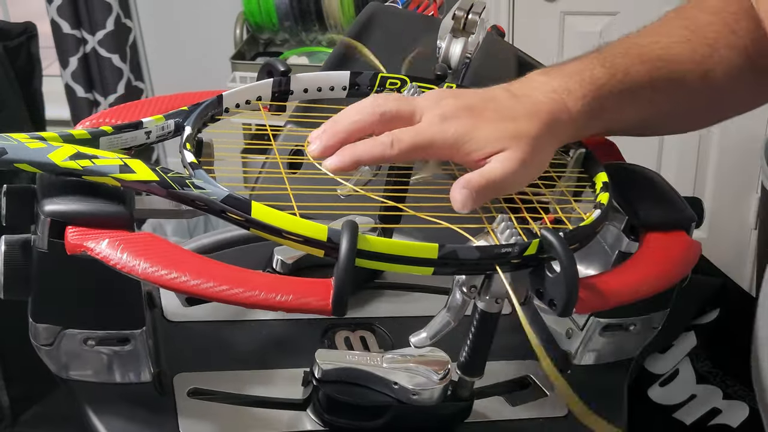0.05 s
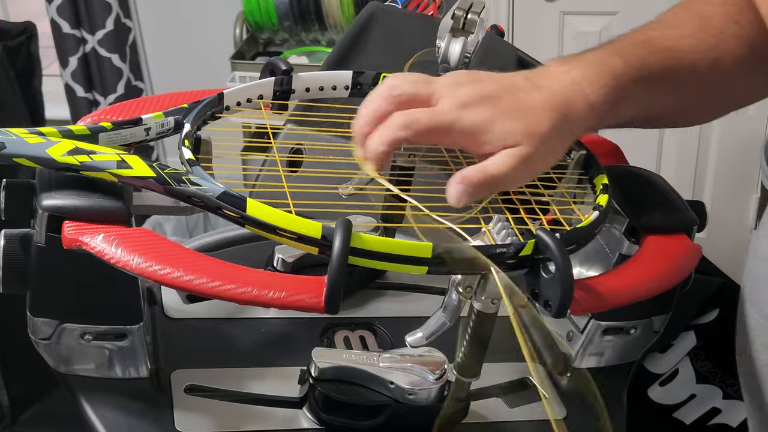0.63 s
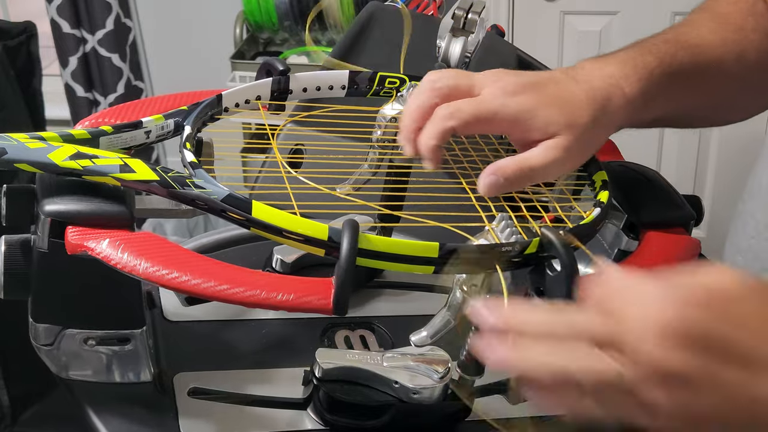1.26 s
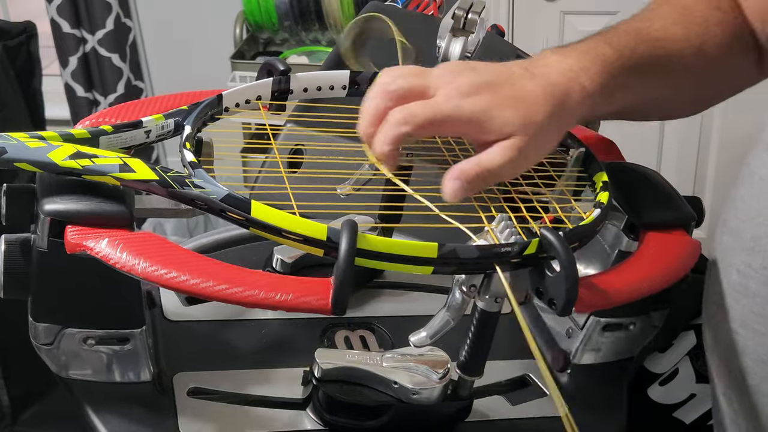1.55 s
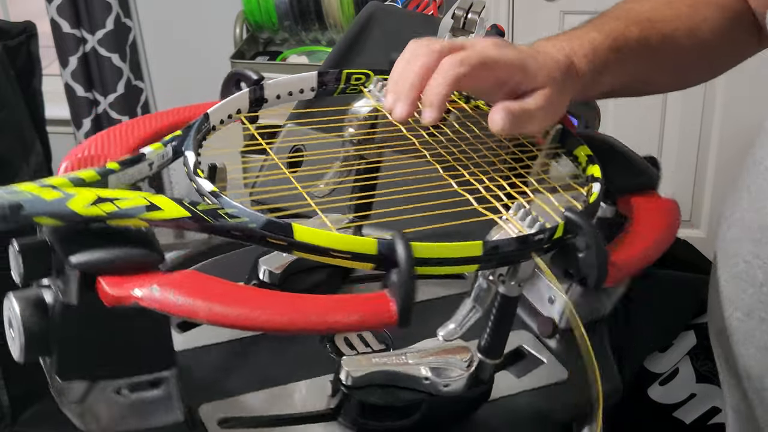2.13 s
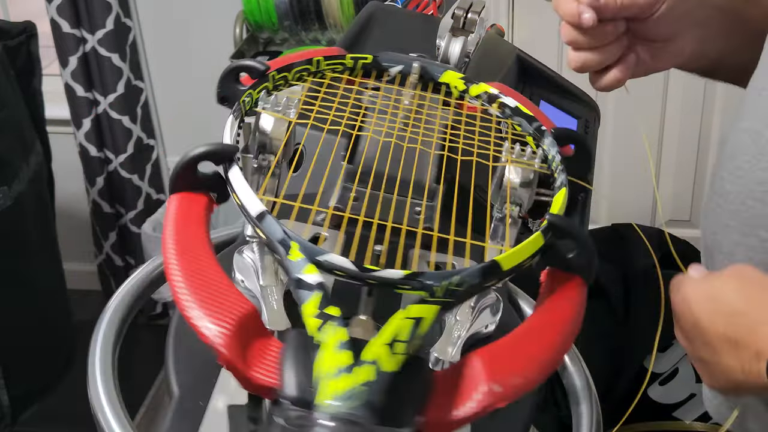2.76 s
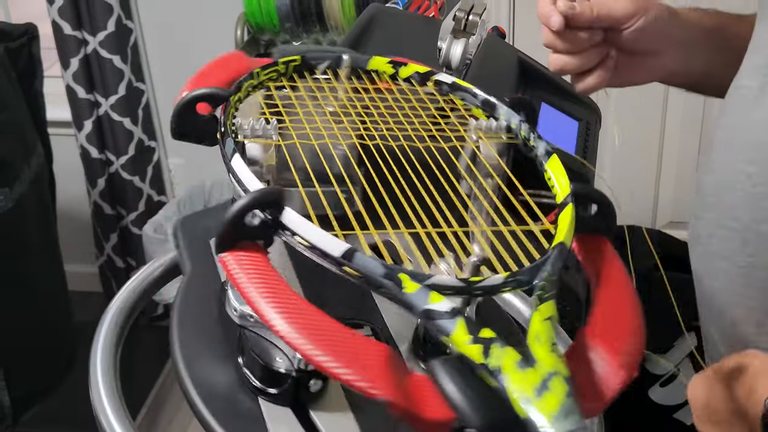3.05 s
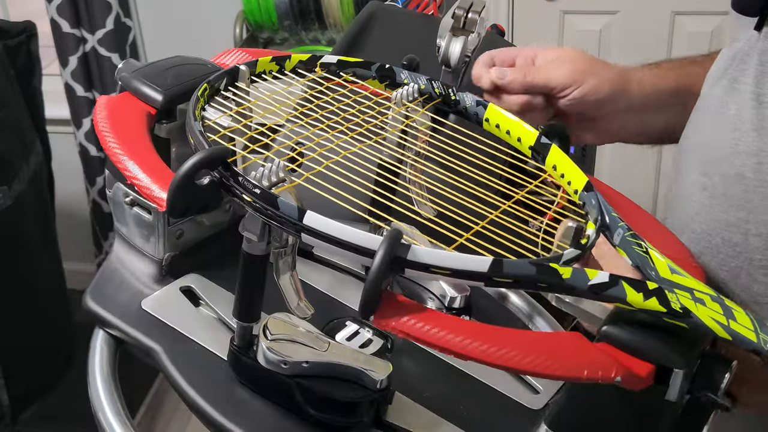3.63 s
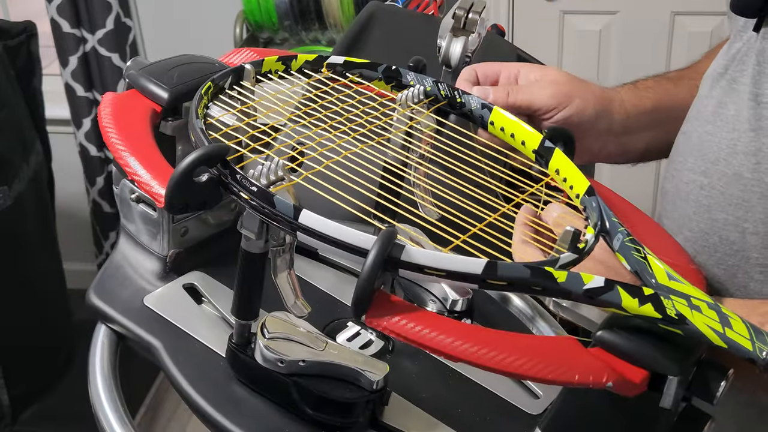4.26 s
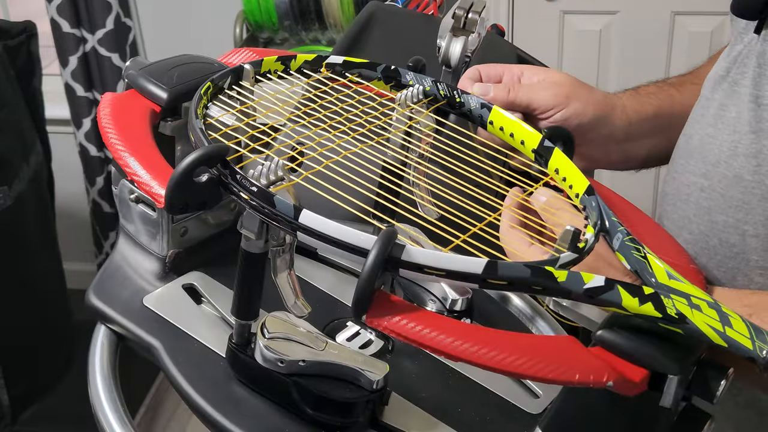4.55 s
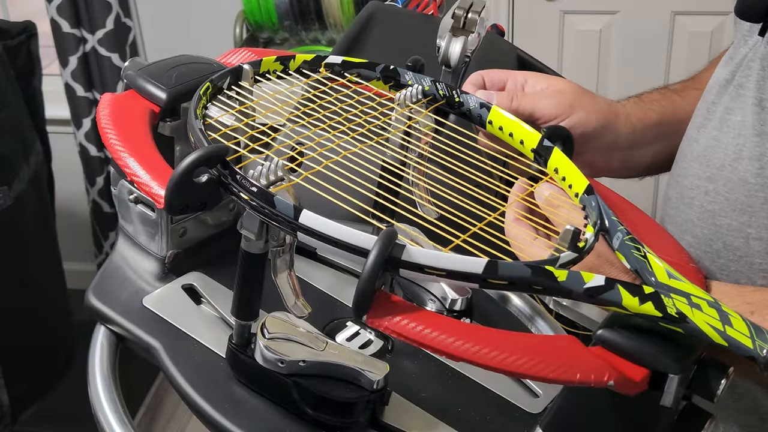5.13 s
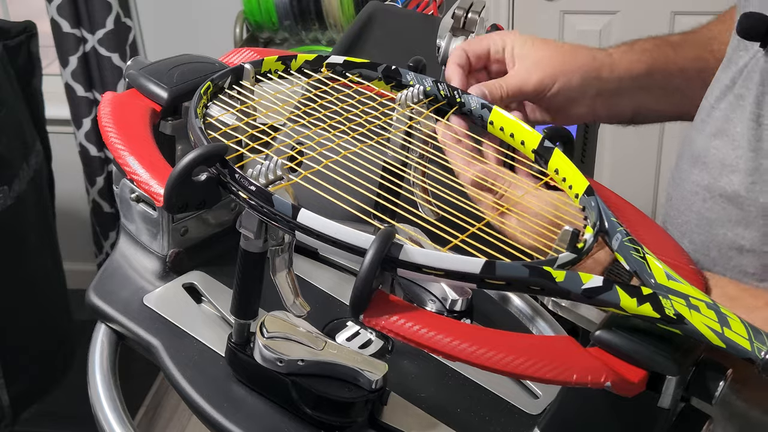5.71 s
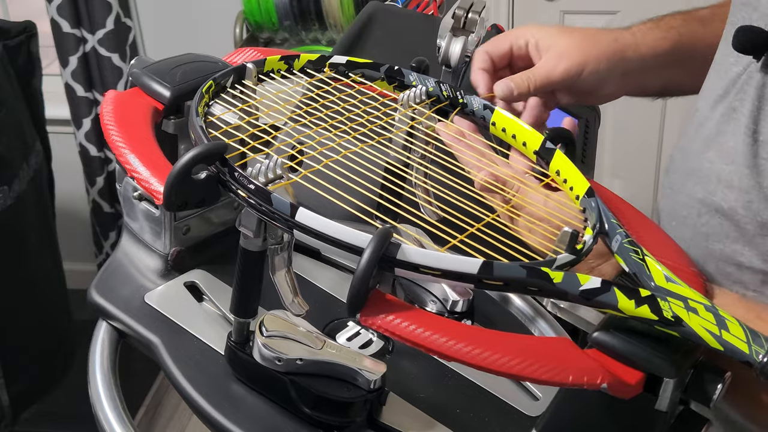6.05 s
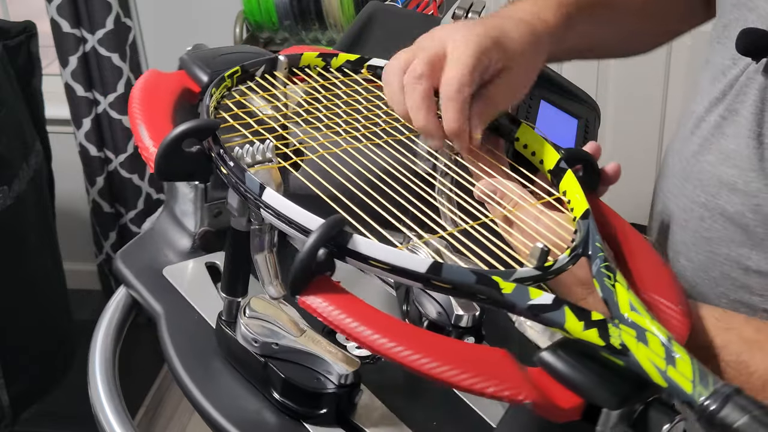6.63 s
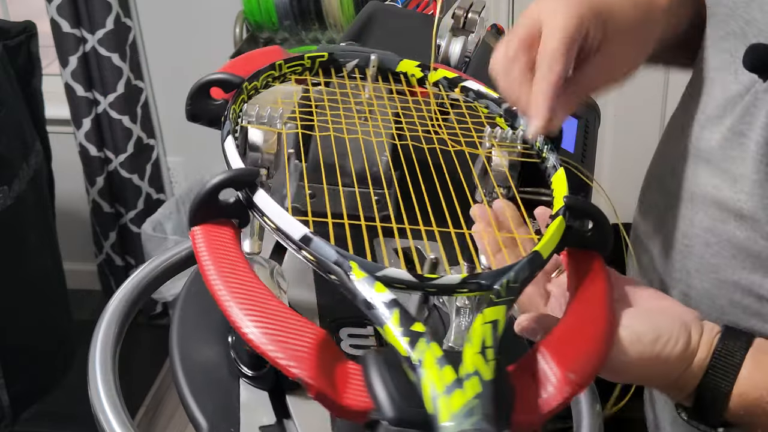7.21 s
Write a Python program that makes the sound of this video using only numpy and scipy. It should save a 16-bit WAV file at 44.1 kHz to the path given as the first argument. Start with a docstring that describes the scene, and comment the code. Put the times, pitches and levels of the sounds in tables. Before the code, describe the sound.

A tennis racket is being strung in a small room, heard through a clip-on microphone. String swishes a few times across the taut strings, which ring slightly, while its loose end ticks on the frame. Quieter weaving follows, with a faint, brief turntable drone. A metal clamp snaps open, and the last pull creaks and squeaks. Dull low bumps and soft sleeve rustle come and go.

```python
"""Stringing a tennis racket.

Small room, clip-on microphone. A cross string swishes over the taut mains, which ring; its loose end
ticks on the frame. Fingers weave the next string, the machine's turntable drones briefly, a clamp snaps
open, and the last pull creaks in stick-slip. Dull low bumps and sleeve rustle as the stringer moves."""
import sys
import numpy as np
from scipy import signal
from scipy.fft import rfft, irfft, next_fast_len
from scipy.io import wavfile

SR = 44100
rng = np.random.default_rng(int(sys.argv[2]) if len(sys.argv) > 2 else 0)


def to_wav(s):
    """Save 16-bit WAV."""
    ch = np.atleast_2d(s).T  # columns
    pcm = np.round(np.clip(ch, -1, 1) * 32767)  # PCM
    wavfile.write(sys.argv[1], SR, pcm.astype(np.int16))


N = 325369
TIME = np.arange(N) / SR

# Event levels are relative; the functions add their own gains.
# strokes: (start [s], length [s], friction [dB], treble re friction [dB], low ring re friction [dB])
PULLS = [(-0.1, 0.13, -14, -3, -6), (0.58, 0.3, -13.5, -1, -7.5), (1.54, 0.17, -15.5, -4, -7.5),
         (1.6, 0.081, -17.5, 1, -14)]
CREAKING_PULL = [(6.77, 0.24, -19, -4, -8.5)]
WEAVING = [(0.139, 0.12, -32, 3.5, -5), (0.365, 0.1, -30.5, 3, -7), (0.501, 0.12, -33, 3, -5.5),
           (1.344, 0.054, -30, 5, -7.5), (1.401, 0.13, -35, 1, -4.5), (1.526, 0.03, -26.5, -6, -0.5),
           (2.162, 0.17, -46.5, -5, -4), (2.36, 0.075, -36, -1, -5), (2.462, 0.26, -49, -1, -3.5),
           (2.87, 0.078, -44.5, -5, -22), (3.079, 0.42, -45.5, -1, -11), (3.512, 0.028, -37, -6, -15),
           (3.847, 0.21, -43, -2, -9), (4.076, 0.38, -56.5, 0, 2), (4.47, 0.028, -41, -4, -4),
           (4.553, 0.035, -42, 2.5, -7), (4.64, 0.11, -45, -1, -11), (5.25, 0.29, -44.5, 4.5, -8),
           (5.646, 0.062, -38, 1, -8.5), (6.029, 0.18, -39.5, -4, -6), (6.283, 0.21, -37, -5, -1.5),
           (6.481, 0.042, -25.5, -4, -11), (6.59, 0.02, -29, -4, -14), (6.641, 0.075, -34, -1, -0.5),
           (7.195, 0.08, -43, -2, -10)]
# hand and sleeve rustle curve: (time [s], level [dB])
RUSTLE = [(0.0, -51.5), (0.33, -52), (0.86, -46.5), (1.07, -55.5), (1.31, -54.5), (1.6, -48.5),
          (1.95, -57.5), (2.44, -59), (3.8, -48), (4.13, -57.5), (5.06, -60), (5.3, -56.5), (5.81, -48.5),
          (6.55, -46.5), (6.94, -45.5), (7.27, -57.5), (7.38, -60)]
# string taps on frame and machine: (time [s], level [dB], treble re level [dB])
TICKS = [(0.1271, -6, -11), (0.3578, -20, -9), (0.386, -12, -6), (0.417, -3, -3), (1.3314, -14.5, -4),
         (1.355, -12, -4.5), (1.483, -9.5, -5), (2.173, -21, -14), (2.2495, -17.5, -11),
         (2.356, -15, -13.5), (2.4042, -13.5, -7), (2.6244, -16.5, -7), (2.8138, -15.5, -0.5),
         (2.818, -17.5, 1), (2.8662, -22, 4.5), (2.901, -20.5, -4), (3.1051, -16, -9), (3.5194, -16.5, -11),
         (3.9004, -20, -9), (4.1305, -27.5, -18), (5.463, -20, -3.5), (5.5223, -20.5, -9),
         (6.2726, -18.5, -7), (6.4927, -14, -6), (6.589, -13, -11), (7.0745, -13.5, -12), (7.2589, -18, -9)]
# hand landing on strings and frame: (time [s], level [dB])
PATS = [(.425, -28), (.462, -31.5), (.572, -37), (0.933, -24), (5.631, -30.5), (5.682, -35), (6.897, -26.5)]
# narrow rings and zings, plus the turntable's low drone (253 Hz row):
# (start [s], length [s], centre [Hz], width [Hz], level [dB])
ZINGS_AND_DRONE = [(1.35, 0.07, 7800, 300, -34), (1.355, 0.04, 14680, 200, -44),
                   (1.645, 0.092, 866, 180, -31.5), (1.652, 0.044, 7180, 910, -17),
                   (1.853, 0.66, 253, 44.7, -50), (2.302, 0.44, 3720, 400, -49),
                   (3.12, 0.07, 1280, 200, -48), (3.375, 0.11, 7700, 250, -44),
                   (3.882, 0.018, 990, 710, -37.5), (4.73, 0.03, 1245, 120, -47),
                   (4.905, 0.06, 1260, 70, -56), (5.287, 0.23, 7670, 300, -49),
                   (6.493, 0.02, 1250, 70, -34)]
# dull bumps: (time [s], level [dB], final pitch [Hz], scuff re level [dB])
BUMPS = [(1.472, -8, 55, -5.5), (1.508, -8, 55, -4), (1.55, 1.5, 64.94, -22), (1.753, -16.5, 82.5, -15),
         (2.068, -16.5, 76, -15.5), (2.35, -20, 55, -17), (3.819, -6.5, 64, -10.5),
         (3.874, -1.5, 65, -13.5), (3.928, 0, 80, -19.5), (4.012, -6.5, 61, -22.5),
         (4.066, -8.5, 57, -15.5), (4.256, -13, 58.5, -28), (6.925, -11, 72, -20), (6.952, -7, 63, -21),
         (6.994, -2, 54.3, -12), (7.076, -5.5, 88, -8.5), (7.113, -1, 65, -17), (7.162, 1.5, 62.4, -24)]
# clamp snap and rattle: (time [s], level [dB], t60 [s])
CLAMP_BLOWS = [(3.5977, -6, 0.044), (3.609, -7.5, 0.067), (3.618, -10, 0.067), (3.638, -16.5, 0.24)]
# close dry clicks: (time [s], level [dB], pitch [Hz])
CLICKS = [(5.334, -24, 2300), (5.404, -18.5, 2150), (5.4171, -13, 3930)]
# friction locked onto one string mode: (start [s], length [s], pitch [Hz], level [dB])
SQUEALS = [(6.792, 0.083, 3875, -23.5), (6.815, 0.088, 1244, -26), (6.825, 0.029, 2490, -23),
           (7.016, 0.01, 2490, -24), (7.019, 0.035, 1520, -34)]

# source spectra: (frequency [Hz], relative density [dB])
PULL_COLOUR = [(350, -46), (600, -17), (919, -13.5), (1050, -13), (1210, 1.5), (1390, -8.5), (1610, -10.5),
               (1780, -8), (2240, -3), (2910, -7.5), (3680, -3.5), (5330, -10), (7310, -8), (14700, -28),
               (16000, -44)]
HUSH_COLOUR = [(15, -56), (25, 1), (70, 9), (405, -2.5), (463, -10), (840, -1), (1230, -12), (1330, -1),
               (1700, -2), (2550, -34), (8590, -5), (12200, -9), (16000, -14)]
RUSTLE_COLOUR = [(40, -1.5), (70, 7), (140, 3), (270, 4), (380, -3.5), (560, -3.5), (750, -8.5),
                 (2000, -8.5), (6000, -12), (12000, -19), (16000, -23)]
TICK_COLOUR = [(400, -24.5), (1200, -8), (3500, -3.5), (7500, 1), (10000, -1.5), (16000, -17.5)]
WEAVE_COLOUR = [(410, -24), (700, -16.5), (1060, -12.5), (1230, 1), (1400, -17.5), (1580, -8), (1730, -15),
                (3690, -10.5), (6920, -12), (7790, -9), (16000, -31.5)]
PAT_COLOUR = [(50, -17), (110, -7.5), (220, -0.5), (330, -13.5), (700, -20), (2000, -60)]
CLAMP_COLOUR = [(150, -38), (250, -17), (414, -17), (576, -6), (775, -7.5), (845, -6), (988, -11),
                (1760, -5.5), (2360, -4.5), (2620, -15), (3060, -5), (4900, -12.5), (6360, -9), (9660, -12),
                (16000, -36)]
CREAK_COLOUR = [(410, -52), (700, -29.5), (1210, -13), (1360, -22), (1770, -15), (2460, -3.5), (3410, -7),
                (3840, -5.5), (4730, -10), (8210, -5), (16000, -28)]

# string bed and frame resonances per stroke type: (frequency [Hz], width [Hz], relative level [dB])
PULL_MODES = [(939, 36, 5.5), (1100, 87, -1), (1231, 37, 5), (1588, 47, 4), (2160, 31, -1.5),
              (2300, 53.4, -3), (3030, 55, -3), (3170, 57, -3.5), (3513, 35, 4.5), (3760, 110, -4),
              (4700, 50, -5), (5900, 130, 0.5), (7290, 280, -30)]
WEAVE_MODES = [(1265, 13, 9), (1480, 53, 4), (2118, 29, 6.5), (2420, 52, 5.5), (3080, 63, 1.5),
               (3690, 350, -0.5), (4960, 200, -2), (7540, 27, -11), (7560, 19, 1), (9150, 83, -11)]
CREAK_MODES = [(1248, 11, 8.5), (1530, 31, 8), (2473, 32, 3.5), (3030, 110, 4), (3830, 120, 7),
               (6410, 30, -6), (8100, 130, -3.5)]
# thin machine metal, tapped: (frequency [Hz], relative level [dB], t60 [s])
METAL_MODES = [(1284, -33, 0.2), (3830, -24.5, 0.1), (7360, -24, 0.1), (7730, -16, 0.063)]
# thin metal under the chattering end: (frequency [Hz], width [Hz], relative level [dB])
CHATTER_MODES = [(3580, 78, -6), (4390, 60, -6), (7560, 35, -1), (7690, 35, 0), (8700, 75, -11),
                 (10700, 45, -14)]
# clamp and base resonances: (frequency [Hz], width [Hz], relative level [dB])
CLAMP_MODES = [(1740, 110, 2), (2220, 130, 0.5), (2920, 160, 4), (3360, 80, 1), (4460, 200, 4),
               (6380, 110, 6)]
# room decay: (frequency [Hz], t60 [s])
ROOM_T60 = [(200, 0.41), (1500, 0.48), (6000, 0.48), (10000, 0.3), (16000, 0.098)]


def from_db(db):
    """Decibels to gain."""
    return 10 ** (np.asarray(db) / 20)


def unit_rms(x):
    """Scale to unit power."""
    return x / np.sqrt(np.mean(x ** 2) + 1e-20)


def at_hz(points, hz):
    """Table lookup on a log-frequency axis."""
    knots_hz, values = np.transpose(points)
    return np.interp(np.log(np.maximum(hz, 1)), np.log(knots_hz), values)


def band(x, low_hz, high_hz):
    """Butterworth band-pass."""
    sos = signal.butter(3, [low_hz, min(high_hz, .49 * SR)], "band", fs=SR, output="sos")
    return signal.sosfilt(sos, x + 1e-18)


def band_noise(low_hz, high_hz):
    """Band of noise, unit power."""
    return unit_rms(band(rng.standard_normal(N), low_hz, high_hz))


def drift(knots_per_s):
    """Random curve through unit-variance knots."""
    knots = rng.standard_normal(8192)
    return np.interp(TIME * knots_per_s, np.arange(len(knots)), knots)


def body(x, colour, modes=(), mode_db=0):
    """Minimum-phase filter of unit power: broad colour plus resonances."""
    size = 2 * next_fast_len(N // 2 + SR // 4)
    hz = np.fft.rfftfreq(size, 1 / SR)
    lift = 1 + sum(from_db(db + mode_db) ** 2 / (1 + (2 * (hz - mode_hz) / width_hz) ** 2)
                   for mode_hz, width_hz, db in modes)
    magnitude = unit_rms(from_db(at_hz(colour, hz)) * np.sqrt(lift))
    cepstrum = irfft(np.log(magnitude))
    response = np.exp(rfft(2 * cepstrum[:size // 2], size) - cepstrum[0])
    return irfft(rfft(x, size) * response)[:N]


def decay(age_s, t60_s):
    """Exponential decay envelope."""
    return from_db(-60 * age_s / t60_s)


def burst(age_s, db, t60_s):
    """Decaying noise of one impact."""
    return from_db(db) * rng.standard_normal(len(age_s)) * decay(age_s, t60_s)


def place(times_s, sounds):
    """Sum short sounds on the timeline."""
    out = np.zeros(N + SR)
    for time_s, sound in zip(times_s, sounds):
        start = max(int(time_s * SR), 0)
        out[start:start + len(sound)] += sound
    return out[:N]


def sliding(strokes, rise_share, slowing_db_per_s):
    """Strokes speed up, hold and slow. Returns friction, treble and low-ring gains."""
    friction = treble = ring = 0
    for start_s, length_s, db, treble_db, ring_db in strokes:
        rise = np.sin(np.pi / 2 * np.clip((TIME - start_s) / (rise_share * length_s), 0, 1)) ** 2
        speed = rise * from_db(-slowing_db_per_s * np.clip(TIME - start_s - length_s, 0, 1))
        friction = np.maximum(friction, from_db(db) * speed)
        treble = np.maximum(treble, from_db(db + treble_db) * speed ** 1.26)  # faster is brighter
        ring = np.maximum(ring, from_db(db + ring_db) * speed)
    return friction, treble, ring


def rub(gains, colour, modes, mode_db, grain_db, judder_db, judder_per_s, echo_gain, flutter_db):
    """String over string: tiny slips, bunched as it catches on each main, shake the bed's resonances."""
    slips = rng.standard_normal(N) * from_db(grain_db * drift(900) + judder_db * drift(judder_per_s))
    # waves return along a changing free length of string
    round_trip_s = np.abs(0.001072 + .00012 * drift(18))
    slips = slips + echo_gain * np.interp(TIME - round_trip_s, TIME, slips)
    sound = body(slips, colour, modes, mode_db)
    low = signal.sosfiltfilt(signal.butter(4, 1600, fs=SR, output="sos"), sound)
    high = signal.sosfiltfilt(signal.butter(3, 5200, "high", fs=SR, output="sos"), sound)
    friction, treble, ring = gains
    ring = ring * from_db(flutter_db * drift(40))
    return friction * unit_rms(sound - low - high) + treble * unit_rms(high) + ring * unit_rms(low)


def background(hush_db=-53, whine_hz=12100, whine_db=-68):
    """Room hush and faint electronic whine."""
    hush = from_db(hush_db) * body(rng.standard_normal(N), HUSH_COLOUR)
    whine = from_db(whine_db) * np.sqrt(2) * np.sin(2 * np.pi * whine_hz * TIME)
    return hush + whine


def rustle(gain_db=11):
    """Hands and sleeves rustle as the arms move."""
    level_db = np.interp(TIME, *np.transpose(RUSTLE))
    return from_db(level_db + gain_db) * body(rng.standard_normal(N), RUSTLE_COLOUR)


def stray_ticks(rate_per_s=6, over_friction_db=15, spread_db=2.5, treble_db=-9, candidates=64):
    """The fed string brushes the frame at random during weaving strokes. Rows as in TICKS."""
    start_s, length_s, friction_db = np.transpose(WEAVING)[:3]
    chance, which, when, strength = rng.random((candidates, 4)).T
    stroke = np.searchsorted(np.cumsum(length_s) / length_s.sum(), which)
    times_s = start_s[stroke] + when * length_s[stroke]
    db = friction_db[stroke] + over_friction_db + spread_db * (2 * strength - 1)
    rows = np.column_stack([times_s, db, np.full(candidates, treble_db)])
    return rows[chance < rate_per_s * length_s.sum() / candidates]


def ticks(crack_t60_s=0.024, buzz_db=-20.5, buzz_t60_s=0.13, crack_db=-5, ring_db=-1.5):
    """String taps: dry crack, brief buzz of the loose end, faint metallic ring."""
    age_s = TIME[:SR // 3]
    times_s, db, treble_db = np.vstack([TICKS, stray_ticks()]).T
    envelope = decay(age_s, crack_t60_s) + from_db(buzz_db) * decay(age_s, buzz_t60_s)
    cracks = rng.standard_normal((len(db), len(age_s))) * envelope * from_db(db + crack_db)[:, None]
    dull = band(place(times_s, cracks), 520, 3950)
    bright = band(place(times_s, cracks * from_db(treble_db + 3)[:, None]), 5000, 21400)
    rings = 0
    for hz, mode_db, t60_s in METAL_MODES:
        strength = from_db(db + mode_db + ring_db + rng.normal(0, 1.9, len(db)))[:, None]
        rings += strength * np.sin(2 * np.pi * hz * age_s) * decay(age_s, t60_s)
    return body(dull + bright, TICK_COLOUR) + place(times_s, rings)


def chatter(envelope, rate_per_s=40, spread_db=4, gain_db=-7.5):
    """The loose end chatters on thin metal; each touch strikes each mode with random strength."""
    touches = (rng.random(N) < rate_per_s / SR) * from_db(spread_db * rng.standard_normal(N))
    out = 0
    for hz, width_hz, db in CHATTER_MODES:
        radius = np.exp(-np.pi * width_hz / SR)
        feedback = [1, -2 * radius * np.cos(2 * np.pi * hz / SR), radius ** 2]
        ring = signal.lfilter([1, 0, -1], feedback, touches * rng.standard_normal(N) + 1e-18)
        out += from_db(db) * unit_rms(ring)
    return from_db(gain_db) * envelope * unit_rms(out)


def pats(t60_s=0.14):
    """The palm meets the racket with a soft thud."""
    thuds = [burst(TIME[:SR // 4], db, t60_s) for _, db in PATS]
    return body(place([row[0] for row in PATS], thuds), PAT_COLOUR)


def zings_and_drone(attack_s=0.0032, release_t60_s=0.3, flutter_db=2.5):
    """Brief narrow rings and zings, plus one low drone of the turntable: fluttering noise bands."""
    out = np.zeros(N)
    for start_s, length_s, hz, width_hz, db in ZINGS_AND_DRONE:
        attack = np.clip((TIME - start_s) / attack_s, 0, 1)
        release = decay(np.maximum(TIME - start_s - length_s, 0), release_t60_s)
        out += from_db(db) * attack * release * band_noise(hz - width_hz / 2, hz + width_hz / 2)
    return out * from_db(flutter_db * drift(45))


def rebounds(count=2, gap_s=0.0544, scatter=0.15, loss_db=9.5):
    """Each bump, then its weaker rocking returns at uneven gaps. Rows as in BUMPS."""
    gaps_s = gap_s * (1 + scatter * rng.standard_normal((len(BUMPS), count)))
    return [(time_s + waits_s[:k].sum(), db - k * loss_db, hz, scuff_db)
            for (time_s, db, hz, scuff_db), waits_s in zip(BUMPS, gaps_s) for k in range(count + 1)]


def bumps(swell_s=0.015, sag=0.11, rumble_db=-15, rumble_t60_s=0.44, gain_db=-2.5):
    """A soft push swells for about a cycle and dies, pitch sagging; a scuff rides it, rumble lingers."""
    age_s = TIME[:SR // 2]
    times_s, db, hz, scuff_db = np.transpose(rebounds())[:, :, None]
    times_s = times_s[:, 0]
    swell = (age_s / swell_s * np.exp(1 - age_s / swell_s)) ** 2
    cycles = hz * (age_s + sag * swell_s * (1 - np.exp(-age_s / swell_s)))
    tail = decay(age_s, rumble_t60_s) * np.minimum(age_s / swell_s, 1)
    push = place(times_s, from_db(db) * swell * np.sin(2 * np.pi * cycles))
    scuff = place(times_s, from_db(db + scuff_db) * swell) * band_noise(84.7, 157.4)
    rumble = place(times_s, from_db(db + rumble_db) * tail) * band_noise(35.2, 82)
    return from_db(gain_db) * (push + scuff + rumble)


def clamp():
    """The jaws spring open and clatter against the stops."""
    blows = [burst(TIME[:SR // 3], db, t60_s) for _, db, t60_s in CLAMP_BLOWS]
    return body(place([row[0] for row in CLAMP_BLOWS], blows), CLAMP_COLOUR, CLAMP_MODES)


def clicks(t60_s=0.0023, gain_db=1.5):
    """Tiny dry clicks, a few damped cycles each."""
    age_s = TIME[:SR // 50]
    envelope = decay(age_s, t60_s)
    pips = [from_db(db + gain_db) * np.sin(2 * np.pi * hz * age_s) * envelope for _, db, hz in CLICKS]
    return place([row[0] for row in CLICKS], pips)


def squeals(wander_hz=31.9, rough_db=3, edge_s=0.0044):
    """Friction locks briefly onto one string mode."""
    out = np.zeros(N)
    for start_s, length_s, hz, db in SQUEALS:
        gate = np.clip(np.minimum(TIME - start_s, start_s + length_s - TIME) / edge_s + .5, 0, 1)
        phase = 2 * np.pi * np.cumsum(hz + wander_hz * drift(150)) / SR
        out += gate * from_db(db + rough_db * drift(200)) * np.sqrt(2) * np.sin(phase)
    return out


def creak(start_s=6.872, count=9, gap_s=0.0185, scatter_s=0.002, first_db=-8, loss_db=1.3):
    """Stick-slip: the string jumps from main to main, weaker each time."""
    times_s = start_s + np.arange(count) * gap_s + scatter_s * rng.standard_normal(count)
    jerks = [burst(TIME[:SR // 10], first_db - k * loss_db, t60_s=0.04) for k in range(count)]
    return body(place(times_s, jerks), CREAK_COLOUR, CREAK_MODES, mode_db=5.5)


def room(x, build_up_s=0.0033):
    """Diffuse reflections, dying sooner in the treble."""
    age_s = TIME[:SR * 3 // 4]
    edges_hz = np.geomspace(100, 17000, 10)
    tail = 0
    for low_hz, high_hz in zip(edges_hz, edges_hz[1:]):
        t60_s = at_hz(ROOM_T60, np.sqrt(low_hz * high_hz))
        tail += band(rng.standard_normal(len(age_s)), low_hz, high_hz) * decay(age_s, t60_s)
    tail *= np.clip(age_s / build_up_s, 0, 1)
    return signal.fftconvolve(x, tail / np.sqrt(np.sum(tail ** 2)))[:N]


def scene():
    """Mono mix of the handwork; sharp sounds feed the room most."""
    pull_gains = sliding(PULLS, rise_share=0.69, slowing_db_per_s=131)
    creak_gains = sliding(CREAKING_PULL, rise_share=0.38, slowing_db_per_s=131)
    weave_gains = sliding(WEAVING, rise_share=0.25, slowing_db_per_s=176)
    swishes = rub(pull_gains, PULL_COLOUR, PULL_MODES, mode_db=6.5, grain_db=1.5,
                  judder_db=0.9, judder_per_s=120, echo_gain=0.42, flutter_db=2)
    rasp = rub(creak_gains, CREAK_COLOUR, CREAK_MODES, mode_db=7, grain_db=3.5,
               judder_db=4, judder_per_s=140, echo_gain=0.15, flutter_db=2)
    pulls = from_db(-0.88) * swishes + from_db(-2.5) * rasp + creak() + squeals()
    feeding = rub(weave_gains, WEAVE_COLOUR, WEAVE_MODES, mode_db=5, grain_db=2.5,
                  judder_db=3, judder_per_s=110, echo_gain=0.29, flutter_db=1)
    tones = zings_and_drone()
    _, weave_treble, _ = weave_gains
    weaving = from_db(-2.5) * feeding + chatter(weave_treble)
    taps = ticks()
    snap = clamp()
    reverb = room(from_db(-6.5) * taps + from_db(-6) * snap + from_db(-14) * pulls)
    close = bumps() + pats() + clicks()
    return (pulls + weaving + tones + taps + snap + reverb + close + background() + rustle())[None]


def record(dry):
    """Soft clip near full scale, then a steep low-pass."""
    rounded = dry / (1 + dry ** 6) ** (1 / 6)
    cutoff_hz = 15900
    return signal.sosfilt(signal.ellip(12, .1, 90, cutoff_hz, fs=SR, output="sos"), rounded)


dry = scene()
out = record(dry)
to_wav(out)
```